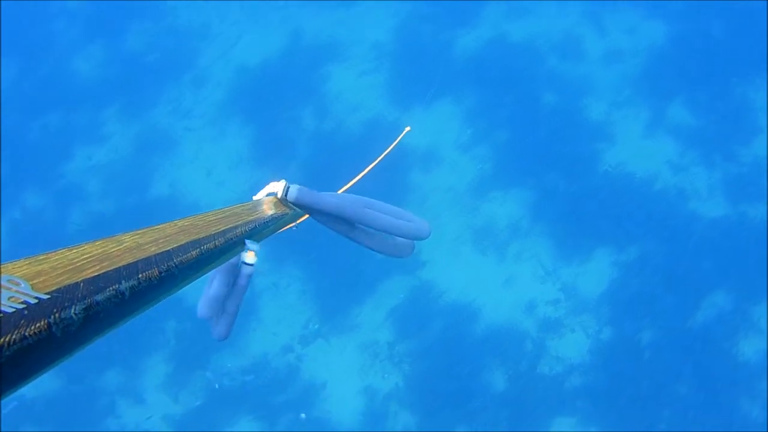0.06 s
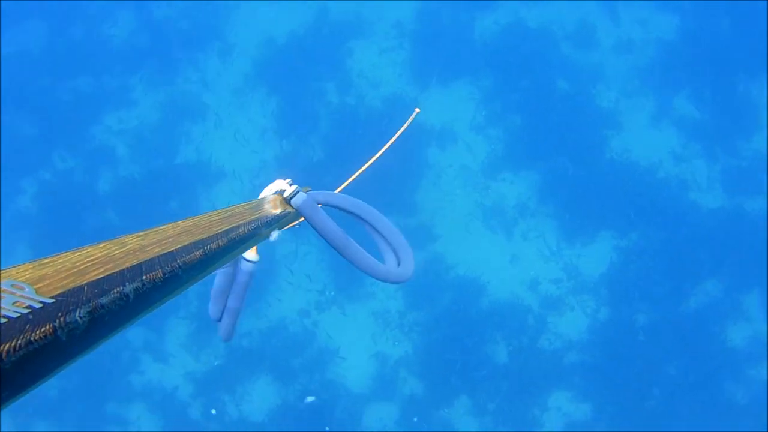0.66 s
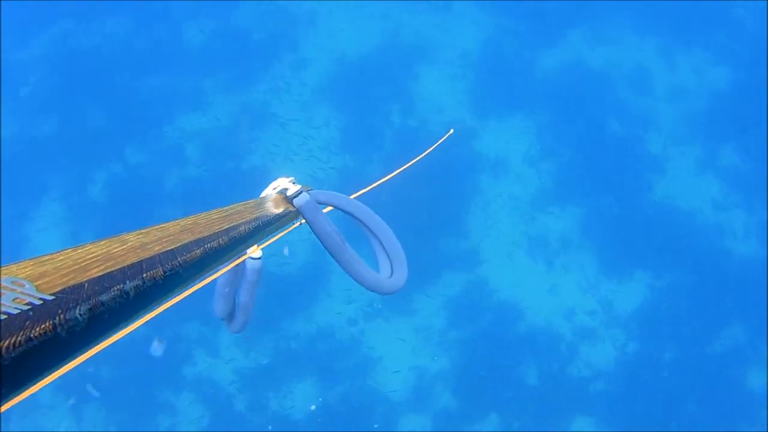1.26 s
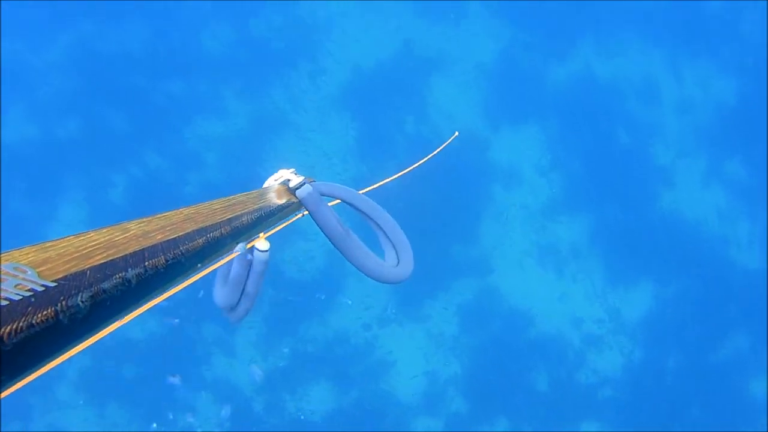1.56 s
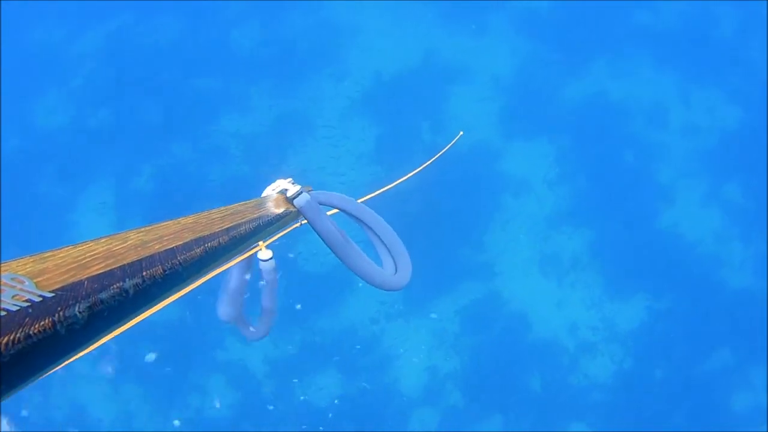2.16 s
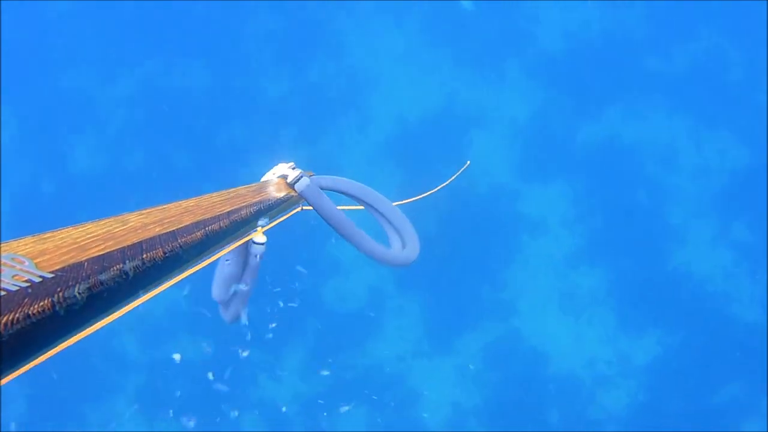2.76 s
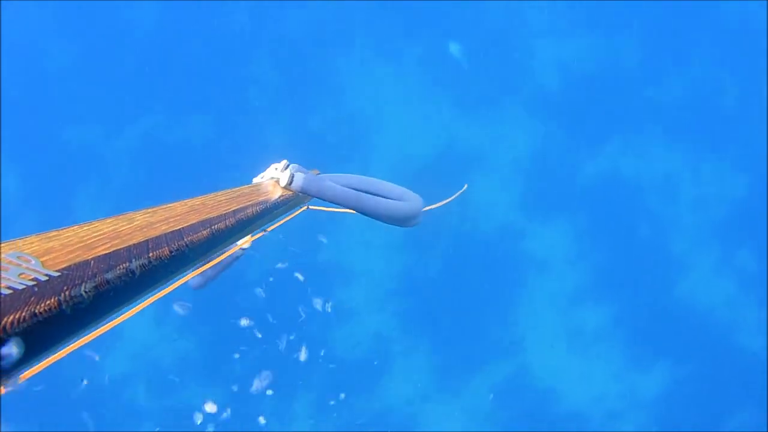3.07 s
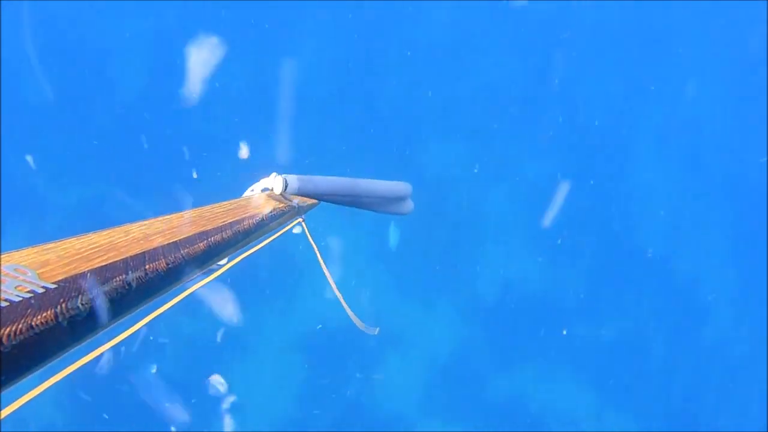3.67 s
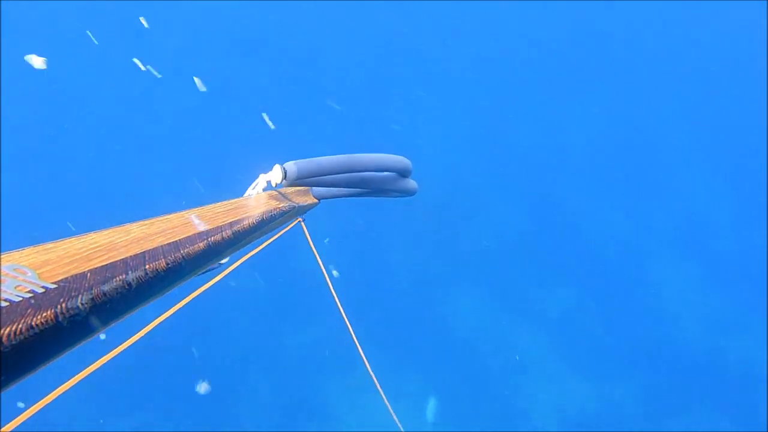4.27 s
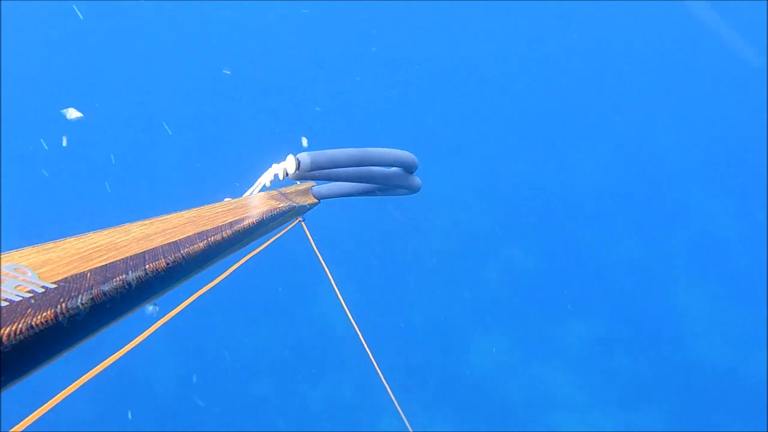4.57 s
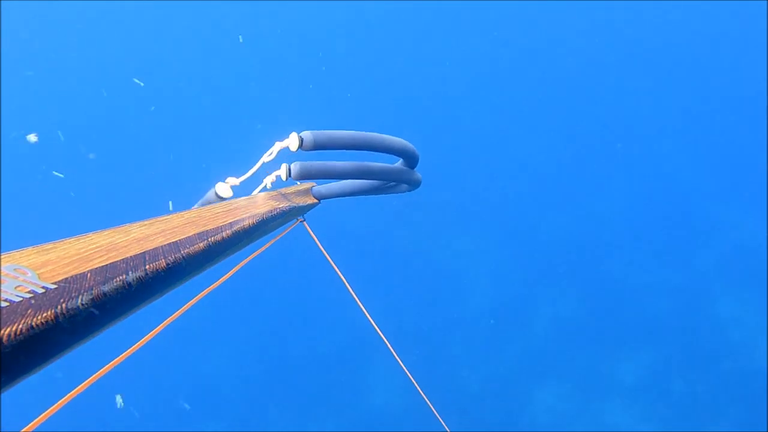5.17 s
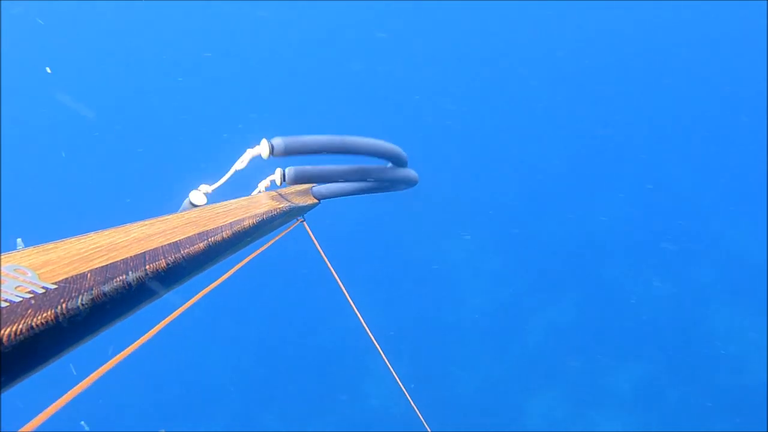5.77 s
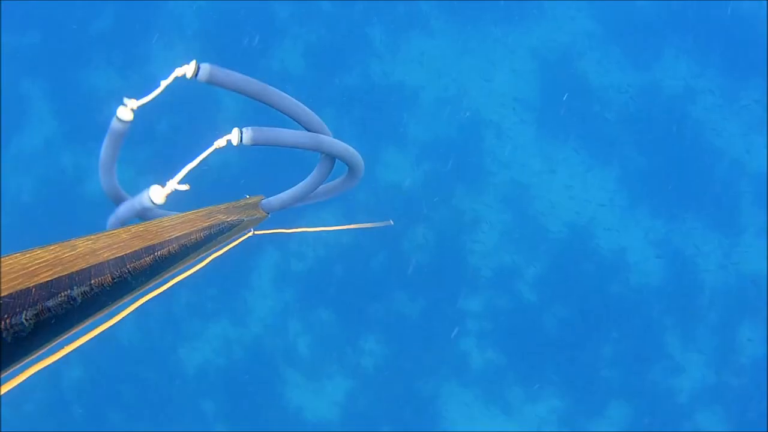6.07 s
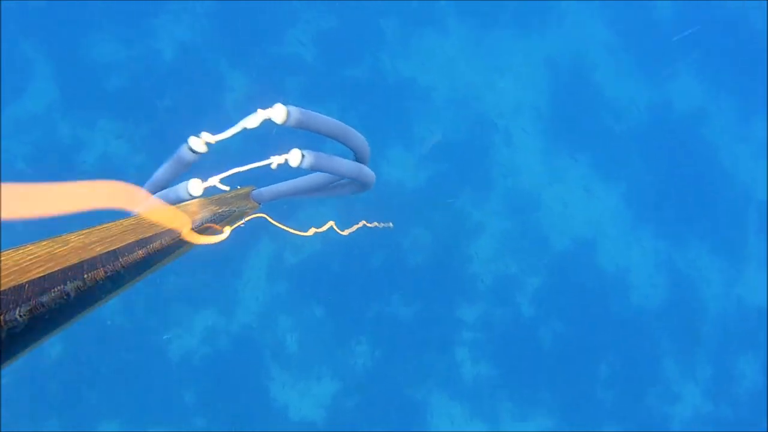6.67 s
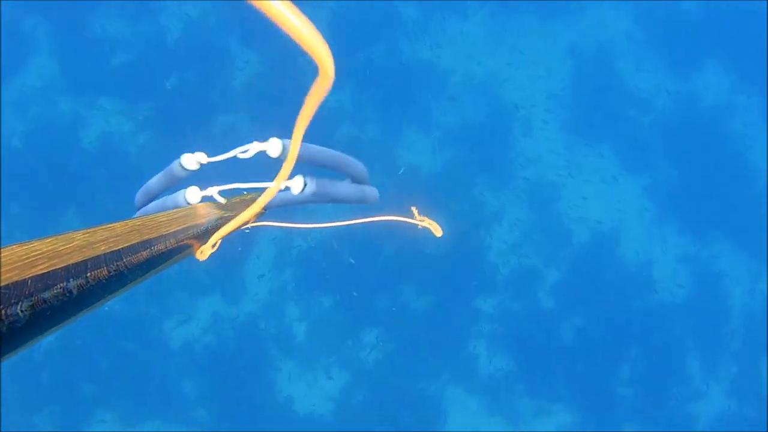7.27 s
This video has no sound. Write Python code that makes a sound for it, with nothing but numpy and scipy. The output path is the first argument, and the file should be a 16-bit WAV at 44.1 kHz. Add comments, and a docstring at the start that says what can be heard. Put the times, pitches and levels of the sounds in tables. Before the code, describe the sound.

The sound is underwater, heard from inside a camera housing on a wooden speargun, with a faint sea hiss, low water rumble and tiny sharp ticks throughout. From the start, air gushes out close by in irregular gulps, gurgling and spraying, with ringing glugs, sharp pops and a few brief, rough sliding notes from the escaping air. At about 2.8 seconds the gush stops. Straggling bubbles plip and pop against the housing, with thin strings of fizz around 3.8 and 4.5 seconds, dying away by about 5 seconds and leaving the quiet sea. Just before 6 seconds the speargun jolts with one loud, sharp crack and a very short ringing knock. A faint grainy rustle follows and continues to the end at a little over 7 seconds, with a quick bubble pop at about 6.5 seconds and a few light ticks.

```python
"""Bubbles around a speargun

Under water, heard from inside a camera housing on a wooden speargun. The sea hisses and ticks faintly.
Air gushes out in gulps for three seconds and breaks into ringing bubbles; stragglers then pop against
the housing. Near the end the gun jolts with one sharp crack, and a faint rustle follows."""
import sys
import numpy as np
from scipy import signal
from scipy.fft import rfft, irfft
from scipy.io import wavfile
from scipy.ndimage import uniform_filter1d

SR = 44100
rng = np.random.default_rng(int(sys.argv[2]) if len(sys.argv) > 2 else 0)


def master_out(mix):
    """Clip the mix to full scale and print it as 16-bit PCM to the path in sys.argv[1]."""
    frames = np.transpose(np.atleast_2d(mix))
    ceiling = np.clip(frames, -1, 1)
    pcm = np.round(ceiling * 32767).astype(np.int16)
    wavfile.write(sys.argv[1], SR, pcm)


N = 322371
T = np.arange(N) / SR
AIR_STOPS_S = 2.781


def amp(db):
    """Turns decibels into a gain."""
    return 10 ** (np.asarray(db) / 20)


def unit(x):
    """Scales a signal to an average power of one."""
    return x / np.sqrt(np.mean(x ** 2) + 1e-20)


def steadied(x, window=1800, floor=1e-9):
    """Evens out swings of level slower than the window (in samples) and keeps the grain."""
    return x / np.sqrt(abs(uniform_filter1d(x ** 2, size=window)) + floor)


def add(mix, start, sound):
    """Mixes a sound in from a start time in seconds."""
    part = mix[max(round(start * SR), 0):][:len(sound)]
    part += sound[:len(part)]


def since(start):
    """Seconds gone by after the start, zero before it."""
    return np.maximum(T - start, 0)


def drift(rate, size=N):
    """Smooth random wandering, with about rate turns a second."""
    knots = rng.standard_normal(4096)
    return unit(np.interp(np.arange(size) / SR * rate, np.arange(4096), knots))


def level_curve(rows):
    """Joins (time, level) points into a gain that changes over time."""
    return amp(np.interp(T, *np.transpose(rows)))


def puffs(rows, open_share=0.25, pinch_s=0.0092):
    """Joint gain of puffs of air: each opens, holds and is pinched off."""
    power = np.zeros(N)
    for start, length, db in rows:
        opening = np.minimum(since(start) / (open_share * length), 1)
        power += (amp(db) * opening * np.exp(-since(start + length) / pinch_s)) ** 2
    return np.sqrt(power)


def swarm(per_s, lo_hz, hi_hz, cycles, spread_db, sizes=36):
    """Bubbles of many sizes born at random; each rings for some cycles, rising a little in pitch."""
    out = np.zeros(N)
    born = np.nonzero(rng.random(N) < per_s / SR)[0]
    size = rng.integers(0, sizes, N)[born]
    strength = np.minimum(rng.exponential(1, N), 4)[born]
    for k, hz in enumerate(np.geomspace(lo_hz, hi_hz, sizes)):
        age = np.arange(int(SR * cycles / hz) + 2) * hz / SR / cycles
        ring = amp(-60 * age) * np.sin(2 * np.pi * cycles * age * (1 + .08 * age))
        births = np.zeros(N)
        births[born[size == k]] = amp(spread_db * strength[size == k]) * np.sqrt(hz)
        out += signal.oaconvolve(births, ring)[:N]
    return unit(out)


# Pitches the housing boosts or weakens: f/Hz, width/Hz, gain/dB
HOUSING_RESONANCES = [(175, 40, 7), (295, 60, 8), (440, 50, 4), (540, 60, 8), (675, 55, 10), (790, 60, 8),
                      (1010, 100, 4), (1210, 80, -8), (1385, 80, 7), (1490, 50, -7), (1650, 280, 7),
                      (1930, 120, -4), (2160, 140, 4), (2540, 150, 3), (2830, 240, -7), (3250, 450, 5),
                      (3900, 250, 5), (4150, 200, -5), (4650, 250, 3), (5650, 350, 5), (6450, 300, -6),
                      (7130, 300, 8), (8000, 250, 4), (8450, 300, 8), (11400, 500, 10)]


def housing(x, spectrum, depth):
    """Colours a sound with a spectrum (f/Hz, level/dB) and the housing's resonances, scaled by depth."""
    hz = np.fft.rfftfreq(8192, 1 / SR)
    points_hz, points_db = np.transpose(spectrum)
    smooth_db = np.interp(np.log(hz + 1), np.log(points_hz), points_db)
    peaks_db = sum(db / (1 + (2 * (hz - f) / width) ** 2) for f, width, db in HOUSING_RESONANCES)
    # Fold the filter so that it rings only after a sound arrives.
    cepstrum = irfft(np.log(amp(smooth_db + depth * peaks_db)))
    cepstrum[1:4096] *= 2
    cepstrum[4097:] = 0
    response = irfft(np.exp(rfft(cepstrum)))[:4096]
    return signal.oaconvolve(x, response)[:len(x)]


def click(hz, ring_s, octave_db, scatter, depth):
    """A click with a noisy tail, centred on hz. Every ring time here is the time to fade by 60 dB."""
    t = np.arange(SR // 8) / SR
    push = scatter * rng.standard_normal(len(t)) * amp(-60 * t / ring_s)
    push[0] += 1
    octaves = np.arange(-4, 5)
    spectrum = np.c_[hz * 2. ** octaves, -octave_db * (np.hypot(octaves, .5) - .5)]
    sound = housing(push, spectrum, depth)
    return sound / abs(sound).max()


# Tone colour of the sea's hiss: f/Hz, level/dB
SEA_SPECTRUM = [(35, -18), (60, -8.5), (118, -7.5), (167, -6.5), (343, -7.5), (385, -9.5), (509, -12),
                (673, -12.5), (869, -16.5), (1740, -22.5), (2410, -22), (2780, -28.5), (3760, -28.5),
                (6870, -35), (15500, -38.5)]
# Low push of water on the housing: t/s, level/dB
WATER_PUSH = [(0.0, -52), (0.03, -46), (0.84, -44), (1.31, -57.5), (1.84, -42.5), (1.94, -53), (2.15, -42),
              (2.18, -60), (2.31, -40.5), (4.01, -64), (5.8, -63), (6.2, -76), (6.502, -54), (7.3, -60)]


def sea():
    """Steady hiss, far bubbles blipping in the housing's resonance, and the rumble of moving water."""
    hiss = unit(housing(rng.standard_normal(N), SEA_SPECTRUM, depth=0.08))
    far = swarm(per_s=110, lo_hz=430, hi_hz=1600, cycles=9, spread_db=2.2)
    blip_spectrum = [(300, -45), (580, -8), (665, 1), (740, -17), (1400, -6.5), (3000, -66)]
    blips = unit(housing(far, blip_spectrum, depth=0.77))
    rumble_spectrum = [(15, -39.5), (34, -7.5), (46, 0), (55, -9.5), (80, -8.5), (130, -35.5), (400, -77)]
    rumble = housing(rng.standard_normal(N), rumble_spectrum, depth=0.076)
    rumble = steadied(rumble, window=9000, floor=1e-12)
    return amp(-53.5) * hiss + amp(-58.5) * blips + rumble * level_curve(WATER_PUSH)


def rustle(start_s=6.05):
    """A faint grainy rustle, likely the slack line sliding along the gun."""
    grains = swarm(per_s=700, lo_hz=900, hi_hz=7000, cycles=8, spread_db=3.2)
    spectrum = [(700, 5.5), (1400, -9), (2400, 4.5), (3200, -7.5), (5000, -2.5), (9000, -18)]
    fade_in = 1 - np.exp(-since(start_s) / 0.022)
    return amp(-61.5) * unit(housing(grains, spectrum, depth=0.57)) * fade_in


# Tiny sharp ticks close by: t/s, peak level/dB
NEAR_TICKS = [(0.377, -32), (0.705, -32.5), (1.0874, -38), (1.2418, -36), (1.4723, -30), (2.5195, -37),
              (3.125, -42), (3.287, -41), (3.6296, -43), (4.517, -43), (4.673, -46), (5.339, -42),
              (5.4644, -43), (6.377, -45), (6.5505, -40), (6.7276, -44.5)]


def ticks():
    """A few near ticks over a faint crackle spread through the sea."""
    out = np.zeros(N)
    for start, db in NEAR_TICKS:
        add(out, start, amp(db) * click(hz=3760, ring_s=0.024, octave_db=40, scatter=0.22, depth=0.13))
    crackle = swarm(per_s=130, lo_hz=2300, hi_hz=6500, cycles=16, spread_db=3.8)
    return out + amp(-70.5) * crackle


# Strings of bubbles drifting past: t/s, length/s, level/dB
BUBBLE_STRINGS = [(3.765, .09, -52.5), (3.812, 0.014, -42.5), (4.27, 0.417, -54), (4.545, 0.11, -42.5)]
# Tone colour of their fizz: f/Hz, level/dB
FIZZ_SPECTRUM = [(200, -33), (500, -15), (800, 3.5), (1700, 0), (2600, 0), (3200, -34), (8000, -25)]


def trail():
    """Thin strings of small bubbles fizz by."""
    fizz = swarm(per_s=900, lo_hz=500, hi_hz=4000, cycles=10, spread_db=3.5)
    return steadied(housing(fizz, FIZZ_SPECTRUM, depth=1.8)) * puffs(BUBBLE_STRINGS)


# Small bubbles close to the housing: t/s, level/dB, starting f/Hz
NEAR_BUBBLES = [(3.269, -50.5, 2700), (3.418, -38.5, 3640), (3.511, -40, 2290), (3.524, -42, 1940),
                (3.721, -40, 1430), (3.771, -42.5, 2320), (3.826, -32, 1930)]


def plops(ring_s=0.058):
    """Small bubbles ring as they near the housing, whose wall drags their pitch down."""
    out, t = np.zeros(N), np.arange(SR // 10) / SR
    for start, db, hz in NEAR_BUBBLES:
        drag = .22 * (1 - np.exp(-t / .03))
        pitch = hz * (1 - drag + .04 * drift(rate=900, size=len(t)))
        attack = 1 - np.exp(-t / .0004)
        fade = amp(db - 60 * t / ring_s + 3 * drift(rate=500, size=len(t)))
        add(out, start, attack * fade * np.sin(2 * np.pi * np.cumsum(pitch) / SR))
    return out


def stragglers(fade_db_per_s=4, end_s=4.76):
    """Late bubbles plip farther off once the air stops, and slowly fade."""
    bubbles = swarm(per_s=170, lo_hz=450, hi_hz=2600, cycles=16, spread_db=3.2)
    bubbles = unit(housing(bubbles, [(600, 5.5), (1400, 7), (2600, -11.5)], depth=1))
    fade = amp(-52.5 - fade_db_per_s * since(AIR_STOPS_S)) * np.exp(-since(end_s) / 0.19)
    return bubbles * (T > AIR_STOPS_S) * fade


# Popping bubbles: t/s, peak level/dB, f/Hz
BUBBLE_POPS = [(0.151, -22, 1440), (.2495, -23, 1770), (0.593, -20.5, 1420), (.7995, -19.5, 786),
               (1.066, -30, 523), (1.141, -20, 870), (2.002, -34, 835), (2.279, -15, 1700),
               (2.458, -20.5, 1480), (2.691, -20.5, 1840), (3.126, -37, 1330), (3.269, -38, 1220),
               (3.419, -32, 1330), (3.512, -28, 1250), (3.547, -25, 1210), (3.8191, -26.5, 1130),
               (4.603, -34.5, 1110), (4.86, -36.5, 1200), (5.147, -37.5, 625), (6.511, -30, 1150),
               (6.517, -25.5, 700)]


def pops():
    """Bubbles break away sharply or strike the housing."""
    out = np.zeros(N)
    for start, db, hz in BUBBLE_POPS:
        add(out, start, amp(db) * click(hz, ring_s=0.036, octave_db=27, scatter=0.25, depth=1))
    return out


# Blows of the gun: t/s, strength/dB, contact time/s
GUN_BLOWS = [(5.9615, -28, 0.00092), (5.967, -21, 0.0013), (5.9724, -16, 0.00078)]
# Tones the struck gun rings with: f/Hz, relative level/dB, ring time/s
GUN_TONES = [(46.3, -23, 0.45), (95, -9.5, 0.061), (180, -19, 0.057), (296, -4.5, 0.068),
             (543, -0.5, 0.054), (690, -11.5, 0.06), (870, 0.5, 0.017), (1290, -5, 0.027), (1574, 2, 0.016),
             (3100, 3, 0.019)]


def jolt():
    """The gun shifts, then snaps hard: three blows set it ringing and the last one cracks."""
    out, t = np.zeros(N), np.arange(SR // 3) / SR
    ring = sum(amp(db - 60 * t / ring_s) * np.cos(2 * np.pi * hz * t) for hz, db, ring_s in GUN_TONES)
    for start, db, contact in GUN_BLOWS:
        push = t * np.exp(-4 * t / contact)  # longer contact sounds duller
        add(out, start, amp(db) * signal.fftconvolve(ring, push / push.sum())[:len(t)])
    snap = rng.standard_normal(len(t)) * amp(-60 * t / 0.0049)
    spectrum = [(500, 5), (2500, 0), (4500, -1.5), (8000, -8), (13000, -3), (16000, -15)]
    crack = housing(snap, spectrum, depth=0.35)
    add(out, GUN_BLOWS[-1][0] - .0005, amp(-14) * crack / np.linalg.norm(crack))
    return out


# Big single bubbles: loudest t/s, level/dB, f/Hz, ring time/s
BIG_BUBBLES = [(.14, -34, 175.5, 0.2), (.174, -16.5, 1380, 0.058), (.257, -22, 541, 0.11),
               (.271, -25, 1017, 0.25), (.309, -19.5, 1382, 0.093), (.38, -28.5, 279.6, 0.11),
               (.414, -23.5, 1374, 0.14), (.419, -23, 1523, 0.17), (0.461, -29.5, 442, 0.066),
               (.804, -26, 442, 0.087), (.815, -29.5, 276, 0.12), (1.217, -22.5, 678, 0.11),
               (1.398, -20.5, 537, 0.11), (1.56, -24.5, 570, 0.34), (1.659, -24, 571, 0.17),
               (1.89, -18, 530, 0.087), (1.945, -28, 300.3, 0.153), (2.107, -20, 545, 0.052),
               (2.287, -23, 882, 0.23), (2.294, -18.5, 533.3, .13), (2.447, -24, 553, 0.1),
               (2.489, -22.5, 561, .06), (2.696, -24.5, 517, 0.2), (2.916, -34.5, 680, 0.17),
               (2.955, -33, 602, .08), (3.043, -28, 675, 0.11), (3.44, -26, 635, 0.029),
               (3.617, -41.5, 695, 0.11), (5.078, -38, 667, 0.089), (5.897, -44.5, 666, 0.19)]


def glugs(swell_share=0.057):
    """A big bubble swells as its neck pinches off, then dies away with a wobbling, rising pitch."""
    out, t = np.zeros(N), np.arange(-SR // 16, SR // 5) / SR
    for peak_s, db, hz, ring_s in BIG_BUBBLES:
        swell = np.exp(-.5 * (t / (swell_share * ring_s)) ** 2)
        shape = np.where(t < 0, swell, amp(-60 * np.maximum(t, 0) / ring_s))
        pitch = hz * (1 + .3 * t + .028 * drift(rate=260, size=len(t)))
        wobble_db = 1.3 * drift(rate=200, size=len(t))
        tone = np.sin(2 * np.pi * np.cumsum(pitch) / SR)
        add(out, peak_s + t[0], amp(db + wobble_db) * shape * tone)
    return out


# Singing necks of air: t/s, length/s, first f/Hz, last f/Hz, level/dB, relative overtone level/dB
AIR_NECKS = [(0.394, 0.095, 782, 790, -22.5, -18), (0.511, 0.088, 784, 787, -23, -4),
             (1.781, 0.14, 874, 782, -25, -4), (1.905, 0.065, 690, 644, -20, -15),
             (2.13, 0.033, 1410, 1215, -27, -25), (2.15, 0.079, 848, 1080, -29, -22),
             (2.679, .036, 674, 1084, -27, -17), (4.288, .28, 761, 835, -50.5, -4)]


def necks():
    """A stretched neck of air sings a rough note that slides as the neck's length changes."""
    out = np.zeros(N)
    for start, length, first_hz, last_hz, db, overtone_db in AIR_NECKS:
        progress = np.linspace(0, 1, int(length * SR))
        slide = first_hz + (last_hz - first_hz) * progress
        pitch = slide * (1 + 0.022 * drift(rate=226, size=len(progress)))
        phase = 2 * np.pi * np.cumsum(pitch) / SR
        arch = np.sin(np.pi * progress) * amp(db + 2.5 * drift(rate=110, size=len(progress)))
        add(out, start, arch * (np.sin(phase) + amp(overtone_db) * np.sin(2 * phase)))
    return signal.sosfilt(signal.butter(4, 2400, fs=SR, output="sos"), out)


# Gulps of air: t/s, length/s, small-bubble spray level/dB, large-bubble gurgle level/dB
AIR_GULPS = [(0, 0.11, -37.5, -39.5), (0.235, 0.071, -27.5, -34), (0.343, 0.082, -27.5, -35),
             (0.476, .108, -31, -45), (0.819, 0.083, -33.5, -38), (0.911, 0.083, -41.5, -38.5),
             (1.113, 0.11, -35, -35), (1.3, 0.052, -33, -32), (1.352, 0.043, -28, -27),
             (1.418, 0.259, -31.5, -32), (1.747, 0.22, -28.5, -36.5), (1.995, 0.049, -31.5, -31.5),
             (2.098, 0.065, -28, -42), (2.162, 0.047, -35.5, -37), (2.232, 0.077, -27, -29),
             (2.408, 0.058, -36, -31), (2.541, 0.072, -34, -37), (2.659, 0.067, -35, -28.5)]
# The leak between gulps: t/s, level/dB
AIR_LEAK = [(0, -34.5), (.66, -48), (.85, -39.5), (1.06, -49), (1.35, -41.5), (2.78, -41.5)]


def gulping(spray_fall_db_per_s=293, gurgle_fall_db_per_s=168):
    """Gains of spray, gurgle and air pockets: the gulps ride on a leak until the air stops."""
    leak, stopped_s = level_curve(AIR_LEAK), since(AIR_STOPS_S)
    spray_left = amp(-spray_fall_db_per_s * stopped_s)
    gurgle_left = amp(-gurgle_fall_db_per_s * stopped_s)
    spray = puffs([(start, length, db) for start, length, db, _ in AIR_GULPS])
    gurgle = puffs([(start, length, db) for start, length, _, db in AIR_GULPS])
    churn = amp(-38) * (leak / leak.mean()) ** 0.52 * gurgle_left  # large bubbles partly follow the leak
    wake = amp(-47.5 - 21 * stopped_s)  # some linger after the air stops
    pockets = amp(-44.5 - 4 * T) * gurgle_left  # big pockets thin out with time
    return (np.hypot(spray, leak * spray_left),
            np.hypot(gurgle, np.maximum(churn, wake)),
            np.hypot(amp(-22) * spray, pockets))  # each gulp shakes more pockets


# Tone colours of the large and the small bubbles: f/Hz, level/dB
GURGLE_SPECTRUM = [(100, -8), (250, -13.5), (400, -9), (550, -0.5), (950, 2.5), (1300, -43), (2200, -28),
                   (5000, -61)]
SPRAY_SPECTRUM = [(200, -18), (800, 1.5), (1300, 2), (1800, -0.5), (2500, -4), (3500, -5), (4500, -19),
                  (6500, -39.5), (12000, -76)]
# Thin hiss of the escaping air: t/s, level relative to the spray/dB
AIR_HISS = [(0, -26), (.55, -53), (.82, -29), (1.45, -32.5), (2.13, -29), (2.86, -34.5)]


def gush():
    """Gulps of air tear into wobbling pockets and a fluttering mix of gurgle, spray and hiss."""
    spray_gain, gurgle_gain, pocket_gain = gulping()
    flutter = amp(drift(rate=41))
    large = swarm(per_s=550, lo_hz=280, hi_hz=1300, cycles=30, spread_db=3)
    large += .45 * rng.standard_normal(N)
    small = swarm(per_s=1600, lo_hz=1000, hi_hz=3000, cycles=40, spread_db=2.8)
    small += 2.6 * rng.standard_normal(N)
    gurgle = steadied(housing(large, GURGLE_SPECTRUM, depth=1))
    spray = steadied(housing(small, SPRAY_SPECTRUM, depth=1.57))
    hiss_spectrum = [(2000, -30), (4800, 0), (8500, -7), (11500, -14), (16000, -24)]
    hiss = unit(housing(rng.standard_normal(N), hiss_spectrum, depth=1.1)) * level_curve(AIR_HISS)
    pocket_spectrum = [(60, -41.5), (130, -5.5), (260, 8), (330, 1.5), (600, -45)]
    pockets = steadied(housing(rng.standard_normal(N), pocket_spectrum, depth=1))
    wobble = amp(2.4 * drift(rate=25))
    return (gurgle * gurgle_gain + (spray + hiss) * spray_gain) * flutter + pockets * pocket_gain * wobble


def scene():
    """Everything reaches one microphone inside the housing."""
    air = gush() + necks() + glugs() + pops() + plops() + stragglers() + trail()
    return (air + ticks() + jolt() + rustle() + sea())[None]


def record(dry):
    """Cuts off the very highest treble."""
    low_pass = signal.firwin(511, cutoff=15850, window=("kaiser", 9), fs=SR)
    return signal.oaconvolve(dry, low_pass[None], "same")


dry = scene()
out = record(dry)
master_out(out)
```